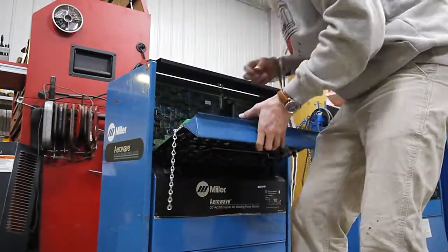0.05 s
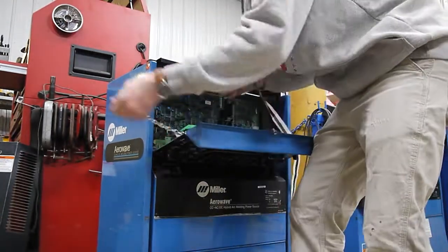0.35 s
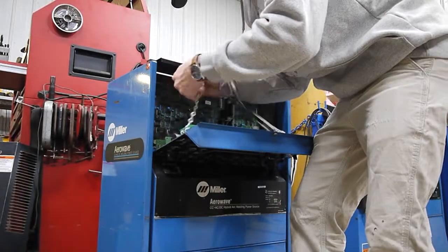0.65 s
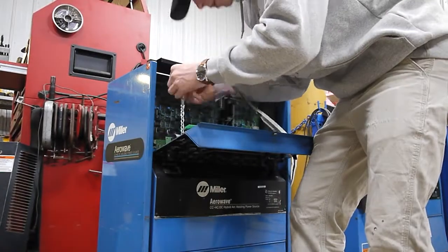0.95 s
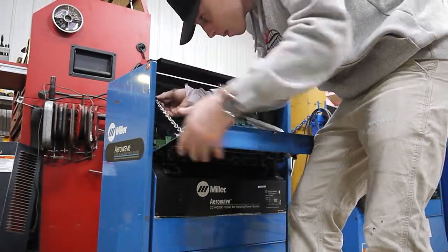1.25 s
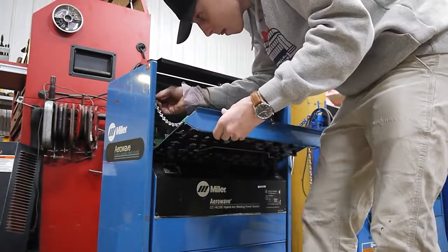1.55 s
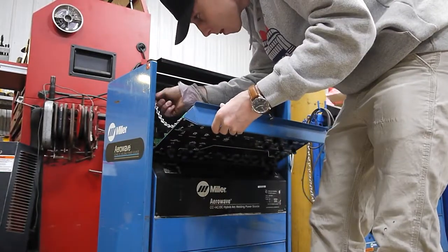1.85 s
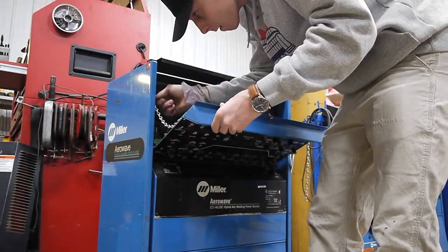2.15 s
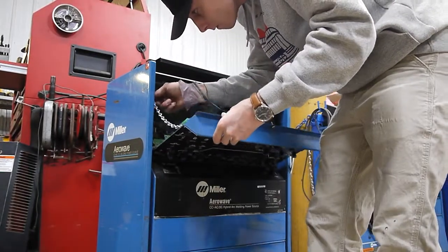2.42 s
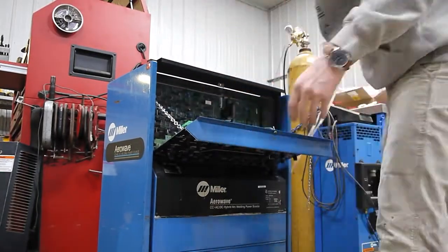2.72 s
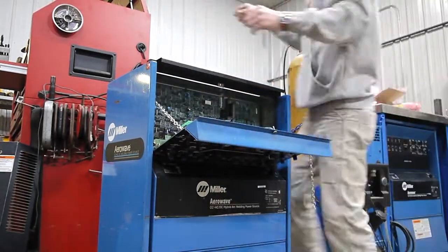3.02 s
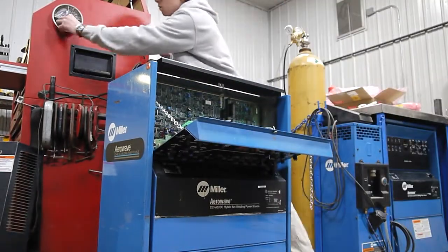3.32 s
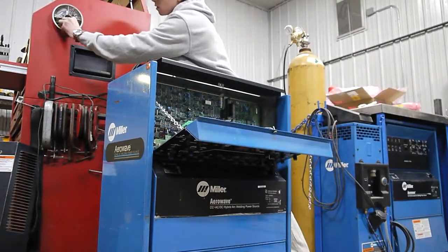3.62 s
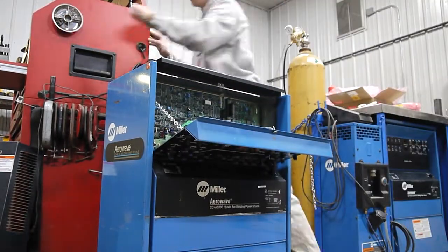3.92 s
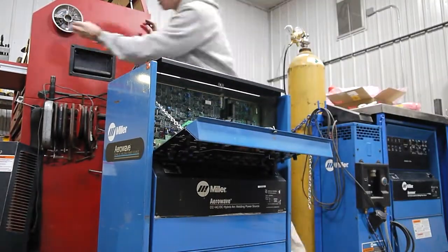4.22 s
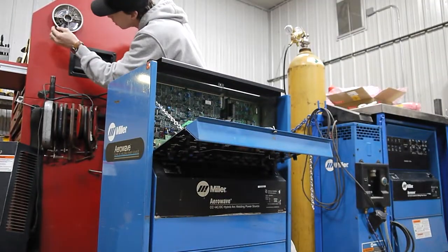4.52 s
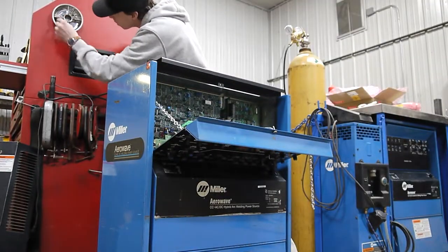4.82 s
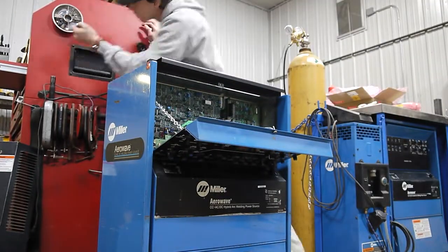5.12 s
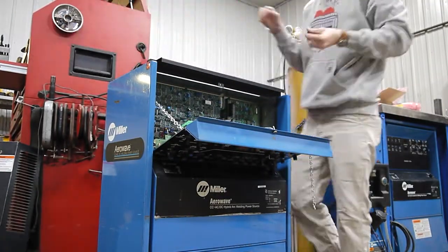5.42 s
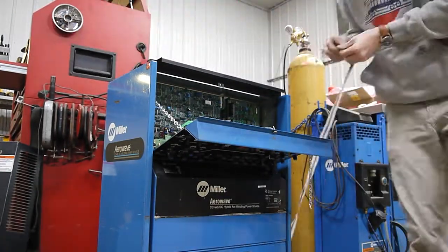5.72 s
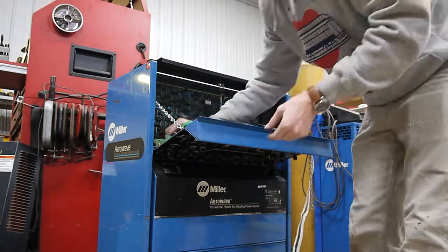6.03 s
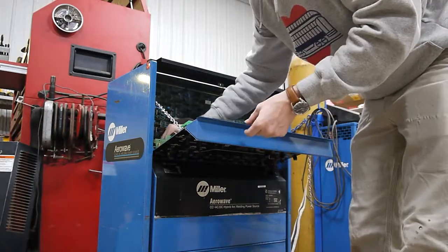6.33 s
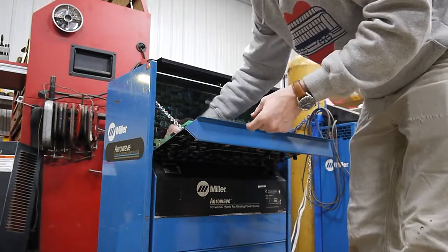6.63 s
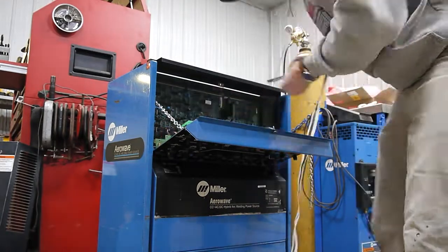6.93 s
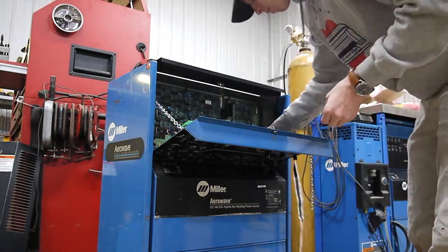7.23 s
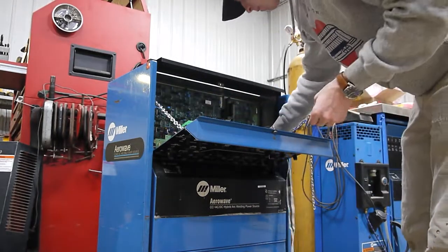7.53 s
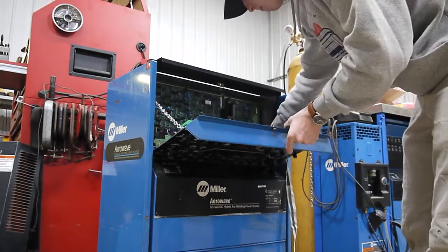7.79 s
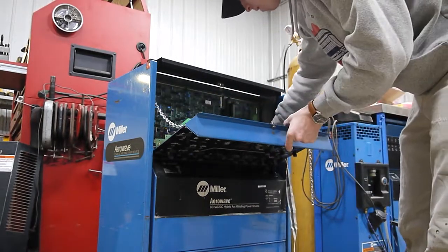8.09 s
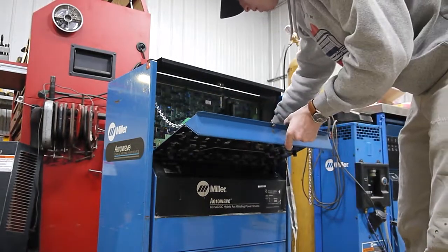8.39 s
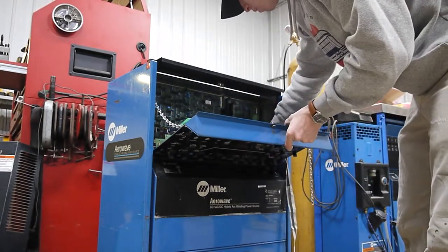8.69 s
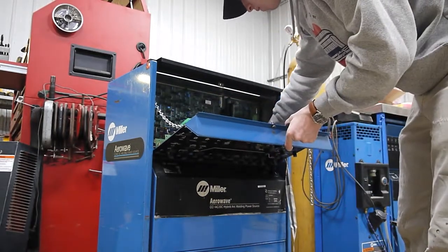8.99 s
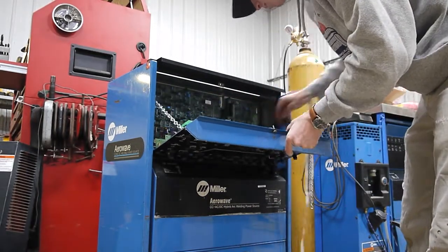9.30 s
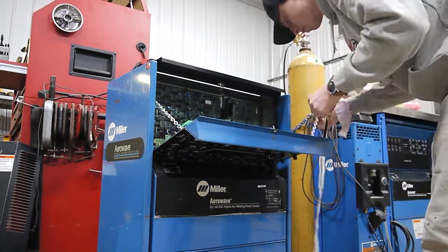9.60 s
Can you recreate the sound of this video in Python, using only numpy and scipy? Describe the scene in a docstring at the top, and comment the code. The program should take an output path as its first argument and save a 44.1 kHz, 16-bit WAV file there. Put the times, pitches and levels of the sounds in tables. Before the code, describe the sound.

Small chain clinks and scrapes, a knock, a few soft steps and thin metal clacks in a quietly humming workshop.

```python
"""A workshop with humming mains and fans, heard through a stereo microphone pair near a cabinet.
A light steel chain is hooked up to hold the cabinet's sheet-metal flap: links clink and drag over the
edge. Someone knocks the frame, steps away and back and handles small hard parts, then the flap clacks
as it is fastened on its other side. Each blow is a burst of micro-bounces that rings the thing struck;
it reaches the microphones directly and again as short echoes from the room."""
import sys
import numpy as np
from scipy import signal
from scipy.fft import rfft, irfft
from scipy.io import wavfile

SR = 44100
rng = np.random.default_rng(int(sys.argv[2]) if len(sys.argv) > 2 else 0)


def inscribe(sig):
    """Save sig as 16-bit PCM at rate SR to the path in sys.argv[1].

    A 1-D sig is mono; a 2-D sig holds one channel per row.
    Samples are clipped to [-1, 1] before scaling.
    """
    pcm = np.round(np.clip(np.atleast_2d(sig).T, -1, 1) * 32767)
    wavfile.write(sys.argv[1], SR, pcm.astype(np.int16))


N = 429975


def amp(db):
    """Decibels to gain."""
    return 10 ** (np.asarray(db) / 20)


def unit_rms(x):
    """Scales to rms 1."""
    return x / np.sqrt(np.mean(x ** 2) + 1e-20)


def curve_at(points, hz):
    """Reads a table on a log-frequency axis."""
    point_hz, value = np.transpose(points)
    return np.interp(np.log(hz + 1), np.log(point_hz + 1), value)


def add(mix, start_s, sound):
    """Mixes a sound in at a time."""
    part = mix[max(round(start_s * SR), 0):][:len(sound)]
    part += sound[:len(part)]


def drift(rate_hz):
    """Slow random wavering of rms 1."""
    hz = np.fft.rfftfreq(N, 1 / SR)
    return unit_rms(irfft(rfft(rng.standard_normal(N)) * np.exp(-(hz / rate_hz) ** 2), N))


# Air noise common to both microphones. Each row: frequency in Hz, relative level in dB.
AIR_COLOUR = [(15, -44), (25, -2.5), (91, -5.5), (123, -9), (144, -6), (235, -7), (382, -5), (414, -4.5),
              (449, -6.5), (486, -5), (1510, -3), (1680, -4), (2030, -5.5), (9460, -16), (15800, -21.5)]
# Noise that differs between left and right. Each row: frequency in Hz, level in dB against the common part.
NOISE_WIDTH = [(25, -19), (120, -27), (1500, -22.5), (3500, -49)]
def ventilation(level_db=-55.5, swell_db=0.78):
    """A steady rush of air fills the room, swelling slightly, nearly the same left and right."""
    hz = np.fft.rfftfreq(N, 1 / SR)
    mid, side = rfft(rng.standard_normal((2, N))) * amp(curve_at(AIR_COLOUR, hz))
    side = side * amp(curve_at(NOISE_WIDTH, hz))
    rush = unit_rms(irfft(np.array([mid + side, mid - side]), N))
    return rush * amp(level_db + swell_db * drift(0.96))


# The tones of the room. Each row: pitch in Hz, level in dB, pitch wander in Hz.
HUM_TONES = [(62.2, -85.5, 0.27), (120.6, -72, 0.24), (234, -81.5, 1.94), (415.4, -72, 1.93),
             (479.6, -71.5, 0.38), (817, -75.5, 6.06), (1147, -71, 5.25), (1403, -82, 4),
             (1651, -67.5, 2.88)]
def hum(flutter_db=1.5):
    """Mains tones hold nearly steady in pitch while fan tones wander; all flutter in level."""
    out = np.zeros(N)
    for hz, db, wander_hz in HUM_TONES:
        cycles = np.cumsum(hz + wander_hz * drift(13.54)) / SR
        out += np.sqrt(2) * amp(db + flutter_db * drift(9.3)) * np.sin(2 * np.pi * cycles)
    return out


# The workshop's decay. Each row: frequency in Hz, seconds to fall by 60 dB.
ROOM_T60 = [(200, 0.13), (1000, 0.32), (4000, 0.27), (9000, 0.34), (16000, 0.15)]
def room_echoes(feed, echoes_per_s=6000, gap_s=0.0033, early_db=4, early_s=0.0064):
    """Strong early echoes from the machines nearby, then a tail whose bass and top die first."""
    taps = rng.standard_normal(SR) * (rng.random(SR) < echoes_per_s / SR)
    hz, frame_s, spectra = signal.stft(taps, SR, nperseg=256)
    decay = amp(-60 * frame_s / curve_at(ROOM_T60, hz)[:, None])
    tail = signal.istft(spectra * decay, SR, nperseg=256)[1]
    t = np.arange(len(tail)) / SR
    onset = np.clip(t / gap_s - 1, 0, 1)
    tail *= onset * (1 + amp(early_db) * np.exp(-t / early_s))
    return signal.fftconvolve(feed, tail / np.linalg.norm(tail))[:N]


def direct_and_feed(x, gain_db, room_db):
    """The sound that goes straight to the microphones, and the share that feeds the room."""
    return amp(gain_db) * np.array([x, amp(room_db) * x])


def body(colour, modes=(), modes_db=0, size=8192):
    """Frequency response of a struck thing: a broad colour with ringing modes standing out of it."""
    hz = np.fft.rfftfreq(size, 1 / SR)
    peaks = sum(amp(modes_db + db) ** 2 / (1 + (2 * (hz - f) / width) ** 2) for f, width, db in modes)
    log_gain = np.log(amp(curve_at(colour, hz)) ** 2 + peaks) / 2
    mirrored = np.r_[log_gain, log_gain[-2:0:-1]]
    return np.exp(np.conj(signal.hilbert(mirrored)))[:len(hz)]  # minimum phase: no ring before the blow


def contact(chatter_s, size=8192):
    """Spectrum of a burst of micro-bounces that dies in milliseconds and excites all pitches alike."""
    t = np.arange(size) / SR
    fade = np.exp(-t / (2 * chatter_s)) * (1 - np.exp(-t / 0.00032))
    burst = rfft(rng.standard_normal(size) * fade)
    whitened = irfft(burst / abs(burst))
    return rfft(whitened * np.sqrt(fade))


def struck_at(response, ring_hz, q, ring_db):
    """The place that is struck adds a resonance of its own to the body."""
    hz = np.linspace(0, SR / 2, len(response))
    return response * (1 + amp(ring_db) / (1 + 1j * q * (hz / ring_hz - ring_hz / (hz + 1))))


def partials(hz, strength, count=18):
    """Each contact also wakes a chance handful of the metal's short-lived high partials."""
    ring_hz = rng.uniform(1800, 15500, (count, 1))
    width_hz = rng.uniform(110, 260, (count, 1))
    return 1 + strength * (1 / (1 + 2j * (hz - ring_hz) / width_hz)).sum(0)


def blow(response, body_db, treble_db, chatter_s, metal=0, split_hz=5000):
    """One contact rings a thing; body and treble, either side of the split, each have their own level."""
    hz = np.linspace(0, SR / 2, len(response))
    treble = 1 / (1 + (split_hz / (hz + 1)) ** 8)
    attack = round(.008 * SR)
    rung = contact(chatter_s) * response * partials(hz, metal)
    low, high = irfft(rung * (1 - treble)), irfft(rung * treble)
    return amp(body_db) * low / low[:attack].std() + amp(treble_db) * high / high[:attack].std()


def knocks(rows, response, chatter_s, metal, q, ring_db):
    """Single blows on one body, each coloured by the place where it lands."""
    out = np.zeros(N)
    for start_s, body_db, treble_db, ring_hz in rows:
        place = struck_at(response, ring_hz, q, ring_db)
        add(out, start_s, blow(place, body_db, treble_db, chatter_s, metal))
    return out


def clinks(rows, response, chatter_s, metal, q, ring_db, rebound_s=.008):
    """A loose link strikes, bounces off and strikes the same place again."""
    out = np.zeros(N)
    for start_s, body_db, treble_db, ring_hz, rebound in rows:
        place = struck_at(response, ring_hz, q, ring_db)
        add(out, start_s, blow(place, body_db, treble_db, chatter_s, metal))
        add(out, start_s + rebound_s, rebound * blow(place, body_db, treble_db, chatter_s, metal))
    return out


def rattle(rows, response, contacts_per_s):
    """Many tiny contacts of uneven size ring a body, fading in and out."""
    out = np.zeros(N)
    for middle_s, length_s, db in rows:
        count = round(length_s * SR)
        clicks = rng.standard_normal(count) * (rng.random(count) < contacts_per_s / SR)
        sound = signal.fftconvolve(clicks * signal.windows.tukey(count, .8), irfft(response))
        add(out, middle_s - length_s / 2, amp(db) * sound / (sound[:count].std() + 1e-12))
    return out


# A shoe on the hard floor. Each row: frequency in Hz, relative level in dB.
FLOOR_COLOUR = [(100, -12), (250, -5), (450, 0.5), (850, 3.5), (1400, 1), (2150, 0.5), (2800, -7.5),
                (4000, -11.5), (8000, -26.5), (15500, -27.5)]
# Steps away from the cabinet and back. Each row: start in seconds, body and treble in relative dB.
HEELS = [(4.152, -52, -69), (5.3117, -47.5, -73), (5.4613, -44, -55), (5.6584, -50, -52.5),
         (5.7913, -48, -58), (5.9508, -52, -61), (6.0524, -44, -61)]
# A dull second contact just after the frame knock, then soles scuffing.
# Each row: start in seconds, body and treble in relative dB.
DULL_CONTACTS = [(3.138, -47.5, -58), (5.47, -46.5, -47), (5.525, -62, -49)]
def steps_and_dull_contacts(sole_delay_s=.01, sole_share=0.23):
    """A step is a short heel click, then the softer sole; the dull contacts are longer and grittier."""
    floor = body(FLOOR_COLOUR)
    steps, dull = np.zeros((2, N))
    for start_s, body_db, treble_db in HEELS:
        add(steps, start_s, blow(floor, body_db, treble_db, chatter_s=0.0015))
        add(steps, start_s + sole_delay_s, sole_share * blow(floor, body_db, treble_db, chatter_s=0.0064))
    for start_s, body_db, treble_db in DULL_CONTACTS:
        add(dull, start_s, blow(floor, body_db, treble_db, chatter_s=0.0074))
    return (direct_and_feed(steps, gain_db=1, room_db=-3)
            + direct_and_feed(dull, gain_db=0.5, room_db=0.5))


# Small hard things. Each row: frequency in Hz, relative level in dB.
HARD_COLOUR = [(300, -18), (1200, 8.5), (2000, 4), (2900, 6), (3700, 7), (4400, 4), (6200, 0.5),
               (8000, -0.5), (10000, -2.5), (12300, -1), (13500, -6), (15500, -4)]
# Small bright ticks: parts in the hand and, near the end, the sliding chain's sparkle.
# Each row: start in seconds, body and treble in relative dB, ring in Hz.
BRIGHT_TICKS = [(3.3758, -65, -50.5, 14100), (3.509, -58, -44, 6500), (4.3805, -45.5, -33.5, 9800),
                (4.9632, -71, -51.5, 9080), (5.8157, -63, -39.5, 11700), (6.1116, -53.5, -54, 2220),
                (6.4249, -50.5, -40.5, 15300), (6.4957, -47, -36.5, 15300), (6.9507, -60, -49.5, 14200),
                (8.3295, -63, -51, 15300), (8.388, -56, -48, 15300), (9.4201, -55, -50, 1240),
                (9.5585, -70, -47.5, 14300), (9.602, -66, -54, 14500), (9.649, -60, -55.5, 14500)]
# Grit on the floor. Each row: middle and length in seconds, relative level in dB.
GRIT = [(5.61, .24, -59)]
def ticks_and_grit():
    """Small parts and sliding links tick as they touch, and grit crackles under a turning shoe."""
    hard = body(HARD_COLOUR)
    ticks = knocks(BRIGHT_TICKS, hard, chatter_s=0.0035, metal=1.6, q=4.9, ring_db=2.5)
    grit = rattle(GRIT, hard, contacts_per_s=1200)
    return (direct_and_feed(ticks, gain_db=-0.5, room_db=-3.5)
            + direct_and_feed(grit, gain_db=-1.5, room_db=-3.5))


# The cabinet's frame. Each row: frequency in Hz, relative level in dB.
FRAME_COLOUR = [(150, -8), (500, -1), (1400, -16), (2200, 1), (4200, -3), (5500, -7), (7000, -10),
                (15500, -23)]
# Its modes. Each row: pitch and width in Hz, relative level in dB.
FRAME_MODES = [(964, 38, 3), (2100, 70, -8), (3420, 60, 0), (3680, 84, 3), (4070, 70, -1), (5220, 110, 7)]
# The knock on it. Each row: start in seconds, body and treble in relative dB, ring in Hz.
FRAME_BUMP = [(3.1204, -36.5, -43, 3600)]
def frame_bump():
    """One knock in passing rings the cabinet's frame."""
    frame = body(FRAME_COLOUR, FRAME_MODES, modes_db=4.5)
    bump = knocks(FRAME_BUMP, frame, chatter_s=.0024, metal=1.5, q=7.1, ring_db=-7)
    return direct_and_feed(bump, gain_db=-0.5, room_db=-5)


# The sheet-metal flap. Each row: frequency in Hz, relative level in dB.
FLAP_COLOUR = [(200, -53), (430, -5.5), (580, -19), (800, 3.5), (1100, 0.5), (1450, -6), (1800, -8),
               (2250, -3), (2750, -14), (3400, -0.5), (5000, -9.5), (6300, -8), (8500, -12), (15500, -15.5)]
# Its modes. Each row: pitch and width in Hz, relative level in dB.
FLAP_MODES = [(760, 47, 6), (1090, 78, -6), (1746, 140, 0), (2240, 220, 2.5), (3270, 240, -4),
              (4230, 89, -17), (4660, 100, -0.5), (5070, 110, -5.5), (5380, 110, -3.5)]
# Knocks on it. Each row: start in seconds, body and treble in relative dB, ring in Hz.
FLAP_CLACKS = [(7.0005, -42.5, -38, 5270), (7.1343, -53.5, -54, 1750), (7.2031, -50.5, -60, 2430),
               (7.679, -48.5, -55, 1030), (7.7124, -47, -60, 2800), (7.9335, -41.5, -43, 773),
               (8.0966, -40, -45.5, 1900), (8.1145, -56, -44.5, 12300), (8.1694, -45.5, -48.5, 7350),
               (8.2183, -47.5, -52, 3210), (8.2397, -43.5, -56, 2690), (8.3959, -47, -39, 15000),
               (8.4243, -51, -50, 3480), (8.4448, -47.5, -37, 3480), (8.5013, -30, -33, 3670),
               (8.5412, -37, -38.5, 2740), (8.585, -41.5, -47, 2250), (8.7496, -34, -37.5, 1850),
               (8.8568, -43.5, -67, 2150), (8.8668, -43, -45, 2070), (8.9162, -50, -55, 2690),
               (9.0524, -36, -37, 8250), (9.1651, -42, -57, 1780)]
def flap():
    """Near the microphones, the thin sheet clacks and rings as it is fastened."""
    sheet = body(FLAP_COLOUR, FLAP_MODES, modes_db=0.5)
    clacks = knocks(FLAP_CLACKS, sheet, chatter_s=0.0029, metal=1.7, q=7.9, ring_db=1.5)
    return direct_and_feed(clacks, gain_db=-0.4, room_db=-4.7)


# Chain on the cabinet's edge. Each row: frequency in Hz, relative level in dB.
EDGE_COLOUR = [(300, -27), (1400, -4), (1750, -11), (2000, 2), (2300, -3.5), (2700, -7), (3300, -0.5),
               (4000, -2.5), (4600, -2), (5500, -7.5), (8000, -8.5), (12000, -9.5), (15500, -11)]
# The edge's modes. Each row: pitch and width in Hz, relative level in dB.
EDGE_MODES = [(1880, 180, -3), (2080, 190, 0), (3370, 170, -2), (3730, 220, 0.5), (4470, 110, 0)]
# Links jumping the edge, and similar scrapes of metal.
# Each row: start in seconds, body and treble in relative dB, ring in Hz, rebound share from 0 to 1.
EDGE_JUMPS = [(1.062, -50, -59, 2110, .1), (1.373, -48.5, -52, 1950, .9), (1.654, -54.5, -54, 4150, 1),
              (1.7025, -51, -40, 3840, .3), (1.7459, -49.5, -46.5, 1880, .6),
              (1.7978, -46, -45.5, 1840, .1), (1.9155, -46, -50, 1950, 0.2), (2.0009, -55, -49.5, 3860, 0),
              (2.022, -48, -52, 4340, 0.5), (2.1206, -49.5, -49.5, 3760, 1), (2.1575, -49, -49, 2000, 0.2),
              (2.2905, -44.5, -47.5, 1810, 0), (4.116, -53, -67, 2250, 0.8),
              (7.3275, -44, -47.5, 2870, 0.53), (7.4166, -48.5, -52.5, 2900, 0),
              (9.5448, -51, -69.5, 2400, 0.7), (9.602, -53, -60, 2360, .4), (9.632, -51, -63, 2300, .6),
              (9.7234, -45.5, -60, 2400, .1)]
# Chain sliding on metal. Each row: middle and length in seconds, relative level in dB.
SLIDES = [(1.08, 0.15, -61), (1.745, 0.078, -53), (1.86, 0.13, -58), (2.15, 0.32, -54.5),
          (2.56, 0.084, -57), (7.36, 0.2, -62), (7.56, 0.23, -60), (8.17, .14, -55), (8.57, 0.17, -54),
          (9.48, .074, -54), (9.62, .14, -59)]
def chain_dragged():
    """Links jump over the cabinet's edge one by one and rasp as they slide along the metal."""
    edge = body(EDGE_COLOUR, EDGE_MODES)
    jumps = clinks(EDGE_JUMPS, edge, chatter_s=0.0042, metal=1.5, q=15, ring_db=7.5)
    slides = rattle(SLIDES, edge, contacts_per_s=700)
    return (direct_and_feed(jumps, gain_db=-0.5, room_db=-3)
            + direct_and_feed(slides, gain_db=-3.5, room_db=-2))


# A light steel link. Each row: frequency in Hz, relative level in dB.
LINK_COLOUR = [(300, -27), (1500, -16), (2400, -3.5), (3100, -13), (3800, -3), (4500, 0.5), (5400, -5),
               (6500, -5), (7600, -2.5), (8800, -7), (10500, -6), (13000, -11), (14000, -7), (15500, -8.5)]
# Its modes. Each row: pitch and width in Hz, relative level in dB.
LINK_MODES = [(4970, 230, -4), (5600, 180, -0.5), (5960, 200, -9), (7650, 240, -14), (12700, 400, -10)]
# Link against link, close and fairly dry.
# Each row: start in seconds, body and treble in relative dB, ring in Hz, rebound share from 0 to 1.
LINK_CLINKS = [(.3441, -45.5, -49, 3480, .1), (.425, -54, -54, 14600, 0.3), (.5137, -51.5, -48, 3500, 0.2),
               (.5412, -48, -43.5, 15300, .95), (.6455, -53, -47, 5270, .95),
               (.7155, -50.5, -52, 2820, 0.4), (.7233, -45, -45.5, 5600, 0), (.928, -65, -53, 13400, .4),
               (1.0165, -51, -47.5, 10400, .2)]
# Loose links jingling. Each row: middle and length in seconds, relative level in dB.
JINGLES = [(.42, 0.27, -65), (.66, 0.18, -61), (3.5, 0.24, -65.5), (4.125, 0.035, -57)]
def chain_lifted():
    """Links strike each other and ring brightly as the chain is lifted; the loose ones jingle."""
    link = body(LINK_COLOUR, LINK_MODES, modes_db=6)
    strikes = clinks(LINK_CLINKS, link, chatter_s=0.0026, metal=1.5, q=9.6, ring_db=6)
    jingles = rattle(JINGLES, link, contacts_per_s=780)
    return (direct_and_feed(strikes, gain_db=0, room_db=-6)
            + direct_and_feed(jingles, gain_db=1.5, room_db=-1.5))


def scene():
    """The workshop from beside the cabinet: air and hum behind the handling sounds and their echoes."""
    direct, feed = (steps_and_dull_contacts() + ticks_and_grit() + frame_bump()
                    + flap() + chain_dragged() + chain_lifted())
    return ventilation() + hum() + room_echoes(feed) + direct


def record(dry, lean_share=0.84, bass_hz=316, centred_above_hz=2410, top_hz=15880):
    """The bass leans right, the treble sits in the centre and the very top is cut off."""
    hz = np.fft.rfftfreq(N, 1 / SR)
    bass = rfft(dry.mean(0)) / (1 + 1j * hz / bass_hz)
    lean = lean_share * irfft(bass / (1 + (hz / centred_above_hz) ** 8), N)
    pair = dry + np.array([-lean, lean])
    lowpass = signal.firwin(601, top_hz, window=("kaiser", 8), fs=SR)
    return signal.oaconvolve(pair, lowpass[None], "same")


dry = scene()
out = record(dry)
inscribe(out)
```